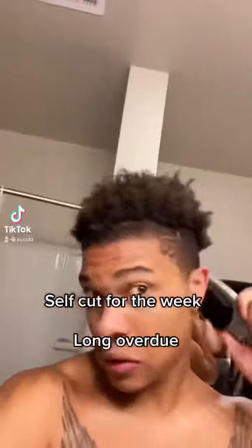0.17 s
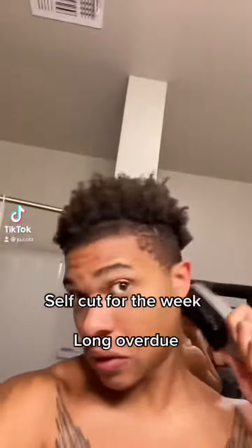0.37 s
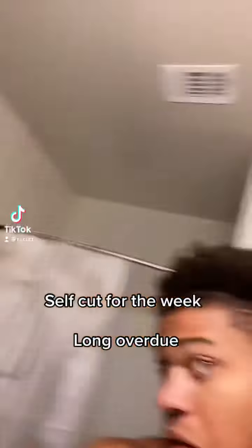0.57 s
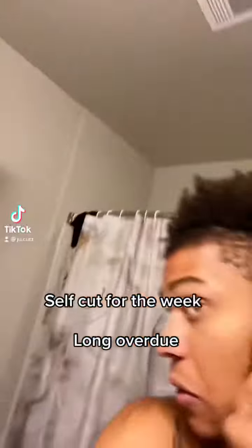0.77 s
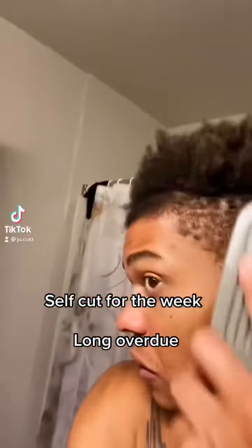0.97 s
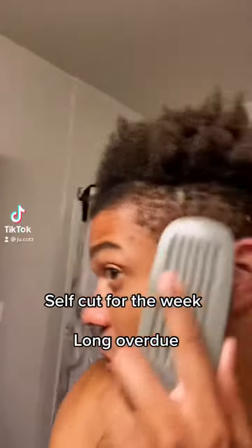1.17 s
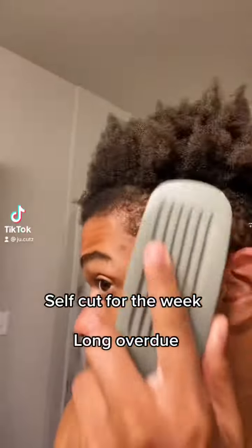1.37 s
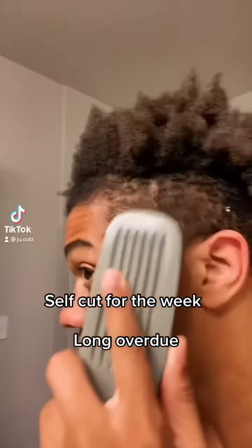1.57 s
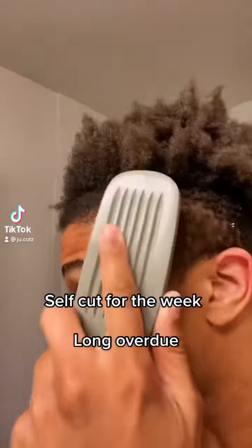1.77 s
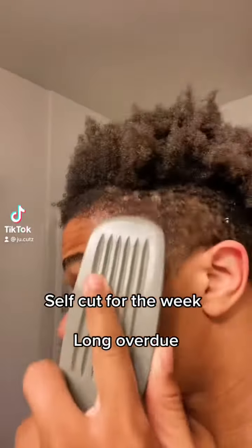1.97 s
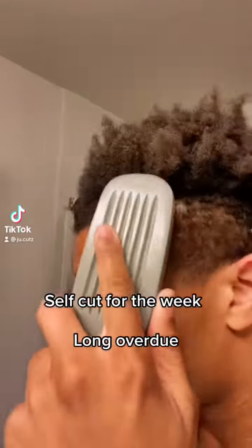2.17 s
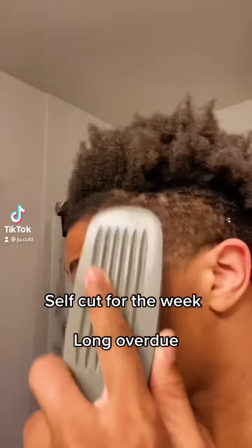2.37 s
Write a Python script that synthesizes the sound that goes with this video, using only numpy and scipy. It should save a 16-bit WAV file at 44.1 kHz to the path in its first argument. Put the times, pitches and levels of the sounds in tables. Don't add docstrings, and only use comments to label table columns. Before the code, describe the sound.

Hair clippers cutting coarse hair in crisp, crackly repeated rasps, faintly humming in a small hard-walled bathroom

```python
import sys
import numpy as np
from scipy import signal
from scipy.fft import rfft, irfft, next_fast_len
from scipy.io import wavfile

SR = 44100
rng = np.random.default_rng(int(sys.argv[2]) if len(sys.argv) > 2 else 0)


def amplitude_ratio(level_db):
    exponent = np.asarray(level_db, float) / 20
    return 10 ** exponent


def generate_wav(signal):
    frames = np.transpose(np.atleast_2d(signal))
    scaled = np.clip(frames, -1, 1) * 32767
    pcm = np.round(scaled).astype(np.int16)
    wavfile.write(sys.argv[1], SR, pcm)


N = 106854
TIME_S = np.arange(N) / SR

# pitch_hz [Hz], width_hz [Hz], level_db [dB]
FLAT_BODY = [(860, 180, 7.5), (1410, 390, -4.5), (1830, 250, 5.5), (2188, 177, 4), (2480, 360, 2.5),
             (2900, 116, 5), (3210, 95, -1), (4940, 890, -5), (5250, 91, -12), (5850, 170, -16),
             (7220, 820, -4.5), (8590, 940, -12), (12800, 6700, -7.5)]


def rms_one(x):
    return x / np.sqrt(np.mean(x ** 2) + 1e-20)


def in_time(rows):
    return np.interp(TIME_S, *np.transpose(rows))


def coloured(x, points):
    size = 2 * next_fast_len(N)
    hz, db = np.transpose(points)
    bins_hz = np.arange(size // 2 + 1) * SR / size
    log_gain = np.interp(np.log(bins_hz + 1), np.log(hz), db) * np.log(10) / 20
    cepstrum = irfft(log_gain, size)
    cepstrum[1:size // 2] *= 2
    cepstrum[size // 2 + 1:] = 0
    return irfft(rfft(x, size) * np.exp(rfft(cepstrum)), size)[:N]


def drift(rate):
    r = np.exp(-80 * np.pi * rate / SR)
    noise = rng.standard_normal(N // 40 + 2002)
    slow = signal.lfilter([1], [1, -2 * r, r * r], noise)[2000:]
    return np.interp(np.arange(N) / 40, np.arange(len(slow)), rms_one(slow))


def resonance(x, hz, width_hz):
    r = np.exp(-np.pi * width_hz / SR)
    b = np.array([1, 0, -1]) * (1 - r * r) / 2
    return signal.lfilter(b, [1, -2 * r * np.cos(2 * np.pi * hz / SR), r * r], x)


def dulled(x, cut_hz):
    r = np.exp(-2 * np.pi * cut_hz / SR)
    return rms_one(signal.lfilter([1], [1, -2 * r, r * r], x))


def swell(start_s, length_s):
    return np.sin(np.pi * np.clip((TIME_S - start_s) / length_s, 0, 1))


def room_air():
    # pitch_hz [Hz], level_db [dB per Hz]
    air_colour = [(25, -19.5), (65, 2), (150, -14), (330, -11.5), (1100, -23.5), (2200, -26.5), (6000, -34),
                  (14500, -43.5), (15800, -47)]
    # pitch_hz [Hz], width_hz [Hz], level_db [dB re hum]
    room_modes = [(72.5, 19, -13.5), (92.3, 5.8, -26.5), (164.2, 3.7, -19), (297.8, 11.6, -19.5),
                  (346.2, 6.5, -21.5)]
    # [dB, added to the room resonances]
    rumble_level = [(.2, 2), (.48, 2), (.56, 4), (.64, -2), (.76, 4), (.85, 1.5), (.97, 4.5), (1.06, 1),
                    (1.15, 3), (1.25, 3), (1.4, -1), (1.55, 0.5), (1.8, -1), (2.1, 2), (2.42, 4)]
    booms = np.zeros(N)
    for hz, width_hz, db in room_modes:
        boom = resonance(rng.standard_normal(N), hz, width_hz)
        boom = rms_one(resonance(boom, hz, 3 * width_hz))
        booms += amplitude_ratio(db + 1.2 * drift(4.4)) * boom
    air = amplitude_ratio(-6) * rms_one(coloured(rng.standard_normal(N), air_colour))
    return amplitude_ratio(in_time(rumble_level)) * booms + air


def motor_hum():
    # time_s [s], level_db [dB re its mean]
    octave_level = [(.2, 3.5), (.6, 3.5), (.8, -1), (.9, 2), (1.1, 6.5), (1.3, -1.5), (1.45, -4),
                    (2.42, 1.5)]
    phase = 2 * np.pi * 119.63 * TIME_S + 0.17 * drift(1.5)
    hum = amplitude_ratio(1.0 * drift(22)) * np.sin(phase)
    octave = amplitude_ratio(-19 + in_time(octave_level) + 1.3 * drift(2.5)) * np.sin(2 * phase)
    return np.sqrt(2) * (hum + octave)


def motor_whine():
    # time_s [s], level_db [dB]
    whine_level = [(.38, -86), (.44, -76), (.54, -68), (.625, -68.5), (.66, -62), (.7, -56.5), (.74, -62),
                   (.9, -66), (.97, -66.5), (1.05, -62.5), (1.09, -67), (1.15, -64), (1.2, -63),
                   (1.34, -89), (1.41, -77), (1.5, -86), (1.7, -100)]
    tone = np.sin(2 * np.pi * 3604 * TIME_S + 0.94 * drift(1.5))
    return np.sqrt(2) * amplitude_ratio(in_time(whine_level) + 0.76 * drift(31)) * tone


def motor_and_air():
    # time_s [s], level_db [dB]
    hum_level = [(0.2, -50), (0.26, -55), (0.62, -50.5), (0.64, -50.5), (0.9, -45.5), (1.24, -52.5),
                 (2.31, -53.5), (2.33, -53.5), (2.42, -52)]
    return amplitude_ratio(in_time(hum_level)) * (motor_hum() + room_air()) + motor_whine()


def rustle():
    noise = rms_one(resonance(rng.standard_normal(N), 480, 240))
    return amplitude_ratio(-55 + 1.5 * drift(17)) * swell(0.627, 0.33) * noise


def bathroom(x):
    t60_s, wall_cut_hz = 0.19, 8600
    out, dull = np.zeros(N), np.exp(-2 * np.pi * wall_cut_hz / SR)
    lags = (rng.uniform(.008, .03, 10) * SR).astype(int)
    for k, lag in enumerate(lags):
        loop, gain, state = x.copy(), amplitude_ratio(-60 * lag / SR / t60_s), [0.]
        for i in range(lag, N, lag):
            back, state = signal.lfilter([gain * (1 - dull)], [1, -dull], loop[i - lag:i], zi=state)
            loop[i:i + lag] += back[:N - i]
        out += (loop - x) * (-1) ** k
    return out


def snaps():
    # start_s [s], peak level_db [dB], ringing pitch_hz [Hz], treble lost above cut_hz [Hz]
    snap_list = [(.541, -58, 5500, 9000), (.6095, -46, 2180, 9000), (.638, -62, 5000, 8700),
                 (.686, -52, 11300, 20000), (.697, -38, 10000, 40000), (.710, -52, 6000, 20000),
                 (.747, -38, 2870, 8000), (.7575, -38, 2490, 8000), (.7975, -25, 2570, 8000),
                 (.8105, -28, 5000, 20000), (.8215, -37, 2800, 6000), (.841, -39, 3350, 9000),
                 (.852, -33, 4300, 12000), (.8625, -27, 3800, 9000), (.8655, -25, 2170, 20000),
                 (.8755, -18, 2630, 14000), (.877, -21, 6400, 30000), (.884, -25.5, 2400, 14000),
                 (.8865, -36, 5300, 20000), (1.081, -48, 2300, 8000), (1.163, -58, 3000, 12000),
                 (1.181, -49, 2500, 8000), (1.311, -44, 7000, 15000), (1.331, -51, 5000, 10000),
                 (1.555, -43, 2900, 9000), (1.82, -56, 4200, 9000), (1.89, -47, 2970, 12000),
                 (2.193, -48, 2200, 5000), (2.255, -44, 2300, 8000)]
    out = np.zeros(N)
    for start_s, db, hz, cut_hz in snap_list:
        click = rng.standard_normal(400) * np.exp(-np.arange(400) / 9)
        click[0] = 4
        ring = amplitude_ratio(13) * resonance(click, hz, hz / 4)
        snap = dulled(click + ring, cut_hz)
        snap = signal.lfilter([1, -1], [1, -.85], snap)
        first = int(start_s * SR)
        out[first:first + len(snap)] += snap * amplitude_ratio(db) / np.abs(snap).max()
    return out


def hair_clicks():
    clicks_per_s = 11000 * amplitude_ratio(1.0 * drift(120))
    sizes = amplitude_ratio(2.5 * np.minimum(rng.exponential(1, N), 5)) * rng.choice([-1, 1], N)
    born = rng.random(N) < clicks_per_s / SR
    return sizes * born * amplitude_ratio(0.6 * drift(27))


def body(x, modes, favour_hz):
    # pitch_hz [Hz], level_db [dB per Hz]
    rasp_colour = [(240, -69), (400, -19), (1140, -8), (1500, -6.5), (2000, -6.5), (2950, -4.5), (4070, -3),
                   (5200, -5), (15700, -13.5)]
    rings = 0.25 * x
    for hz, width_hz, db in modes:
        octaves_off = np.log2(hz / favour_hz)
        lift_db = 5 * np.exp(-(octaves_off / 0.25) ** 2) + 2.2 * drift(10.6)
        rings = rings + amplitude_ratio(db + lift_db) * resonance(x, hz, width_hz)
    return coloured(rings, rasp_colour)


def drag(clicks):
    # pitch_hz [Hz], width_hz [Hz], level_db [dB]
    drag_body = [(867, 130, 7), (1760, 300, 4), (2800, 200, 4), (3270, 100, 11)]
    return amplitude_ratio(-68) * swell(1.53, 0.4) * dulled(body(clicks, drag_body, 1770), 2000)


def touches(clicks):
    # start_s [s], length_s [s], level_db [dB], favoured pitch_hz [Hz], treble lost above cut_hz [Hz]
    landings = [
        (0.674, 0.012, -51, 2520, 29800),
        (1.066, 0.027, -59, 2400, 9000),
        (1.458, 0.017, -59.5, 2900, 5000),
        (1.811, 0.0087, -58.5, 1920, 9000),
        (2.156, 0.009, -57.5, 2400, 4100),
        (2.186, 0.0042, -70, 2300, 4000),
    ]
    out = np.zeros(N)
    for start_s, length_s, db, hz, cut_hz in landings:
        u = TIME_S - start_s
        shape = amplitude_ratio(db - 900 * np.clip(u - length_s, 0, 1))
        shape = shape * np.clip(u / 0.01, 0, 1)
        out += shape * dulled(body(clicks, FLAT_BODY, hz), cut_hz)
    return out


def strokes(clicks):
    # start_s [s], rise_s [s], hold_s [s], level_db [dB], favoured pitch_hz [Hz]
    behind_ear = [
        (.19, 0.13, 0.08, -51, 2370),
        (.27, 0.034, 0.02, -65.5, 4700),
    ]
    swung_near = [
        (.71, 0.06, 0.092, -41, 2950),
        (.83, 0.016, 0.017, -45.5, 4300),
        (.869, 0.0076, 0.0085, -39, 5350),
        (.88, .01, .07, -55.5, 2400),
    ]
    flat = [
        (1.12, 0.05, 0.088, -46, 2400),
        (1.5, 0.056, 0.06, -47, 2640),
        (1.84, 0.059, 0.068, -48, 2480),
        (2.22, 0.045, 0.072, -49, 2280),
    ]
    # pitch_hz [Hz], width_hz [Hz], level_db [dB]
    ear_body = [(925, 69, 5), (1300, 300, -4), (2300, 740, 1.5), (2370, 140, -4), (2850, 540, -10),
                (4140, 120, -1), (4700, 280, 3), (5500, 670, -8.5), (11800, 18000, -0.5), (14500, 1500, -3)]
    near_body = [(926, 210, 1.5), (1900, 230, 5), (2400, 220, 5.5), (2810, 190, -3.5), (3200, 1300, 0.5),
                 (4380, 280, -5), (5380, 260, 3.5), (6370, 200, 2.5), (7500, 580, -2.5), (8300, 510, -2),
                 (10000, 1300, -15), (12400, 2200, 0), (14900, 1600, 1)]
    out = np.zeros(N)
    holds = [(behind_ear, ear_body, 244), (swung_near, near_body, 702), (flat, FLAT_BODY, 244)]
    for stroke_list, modes, release_db_per_s in holds:
        for start_s, rise_s, hold_s, db, hz in stroke_list:
            u = TIME_S - start_s
            rise_db = -18.5 * np.clip(1 - u / rise_s, 0, 3)
            sag_db = -28.5 * np.clip(u - rise_s, 0, hold_s)
            release_db = -release_db_per_s * np.clip(u - rise_s - hold_s, 0, 1)
            shape = amplitude_ratio(rise_db + sag_db + release_db)
            sound = body(clicks, modes, hz)
            loudness = np.sqrt(np.average(sound ** 2, weights=shape ** 2))
            out += amplitude_ratio(db) * shape * sound / loudness
    return out


def rasp():
    clicks = hair_clicks()
    return strokes(clicks) + touches(clicks) + drag(clicks)


def scene():
    near = rasp() + snaps()
    return (near + amplitude_ratio(-19) * bathroom(near) + rustle() + motor_and_air())[None]


def roll_off(x):
    return signal.sosfilt(signal.butter(12, 15800, fs=SR, output="sos"), x)


def record(dry):
    fade_start_s, fade_s = 0.11, 0.17
    fade = np.clip((TIME_S - fade_start_s) / fade_s, 0, 1) ** 1.14
    return roll_off(dry * fade)


dry = scene()
out = record(dry)
generate_wav(out)
```